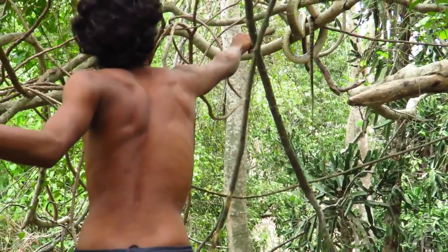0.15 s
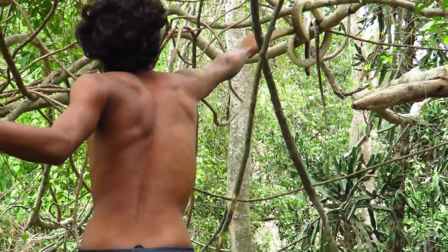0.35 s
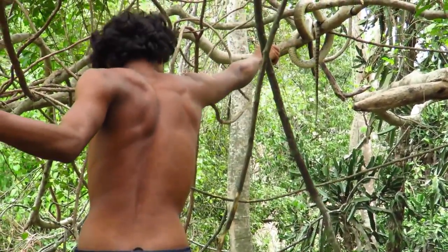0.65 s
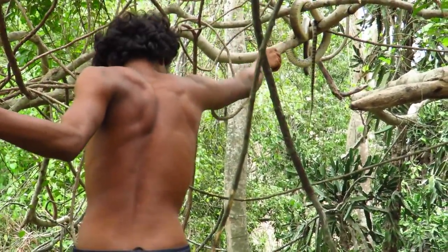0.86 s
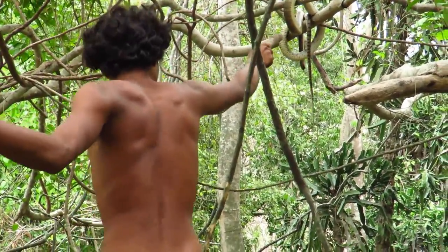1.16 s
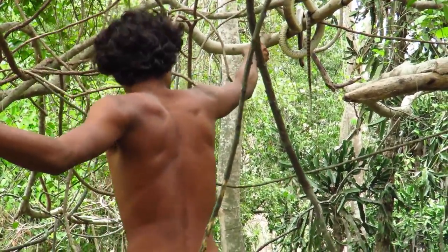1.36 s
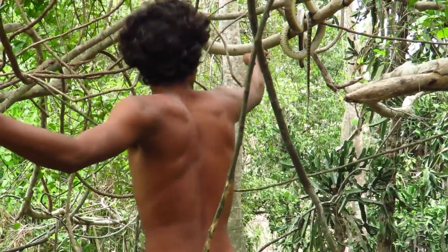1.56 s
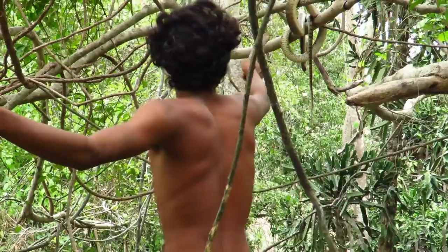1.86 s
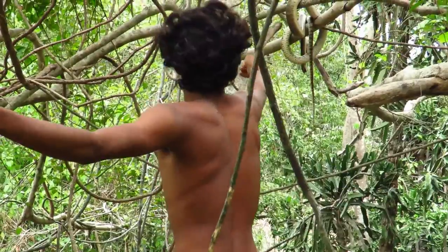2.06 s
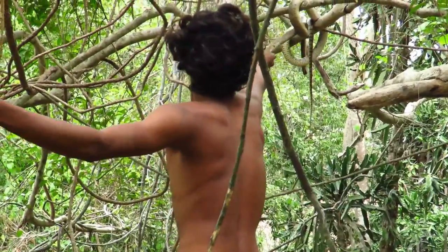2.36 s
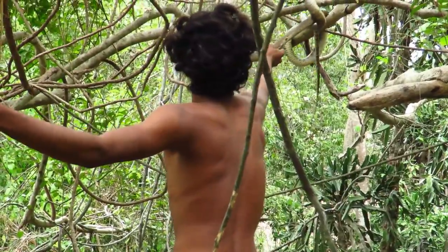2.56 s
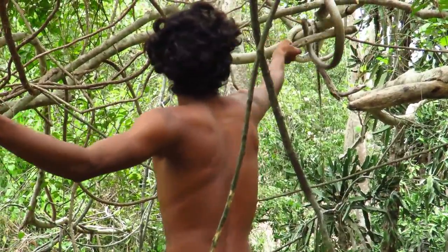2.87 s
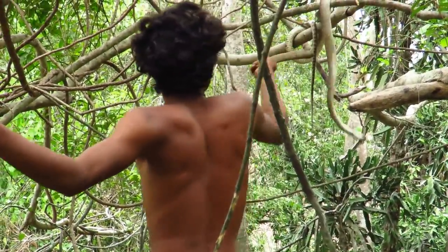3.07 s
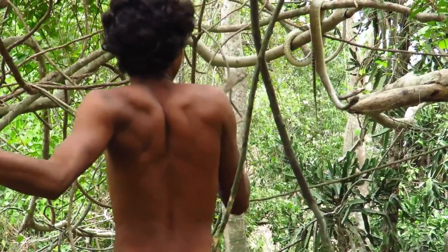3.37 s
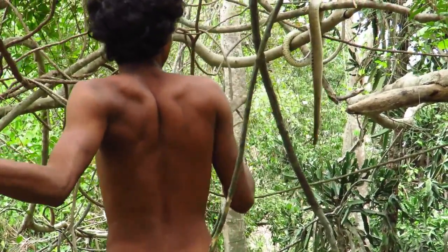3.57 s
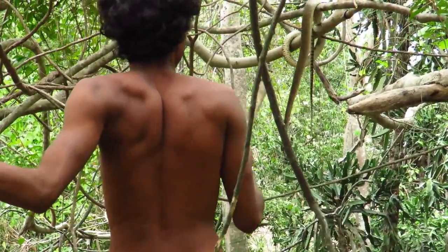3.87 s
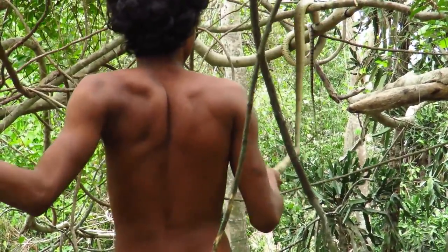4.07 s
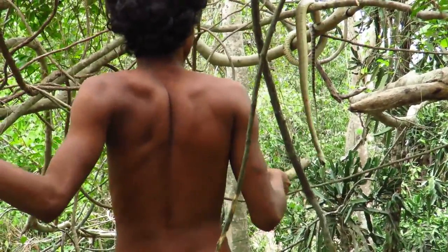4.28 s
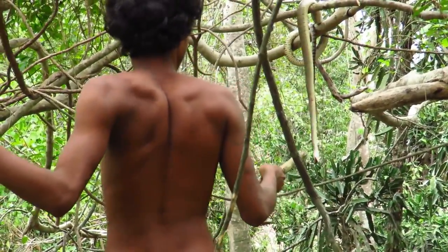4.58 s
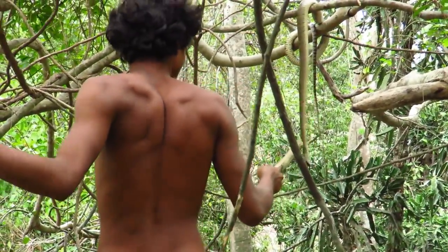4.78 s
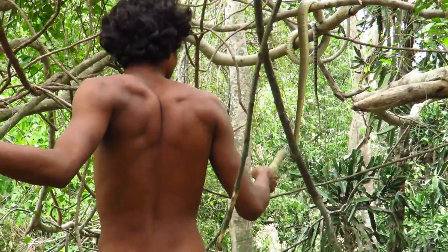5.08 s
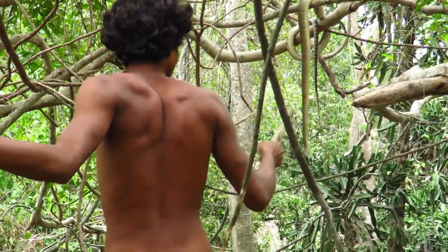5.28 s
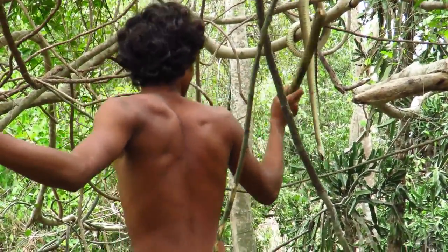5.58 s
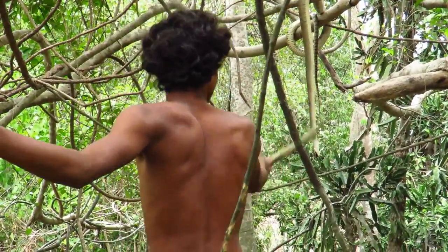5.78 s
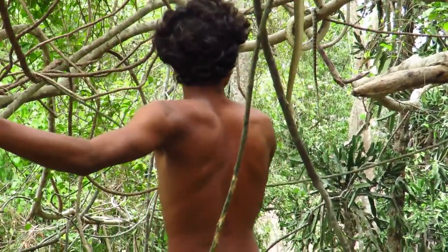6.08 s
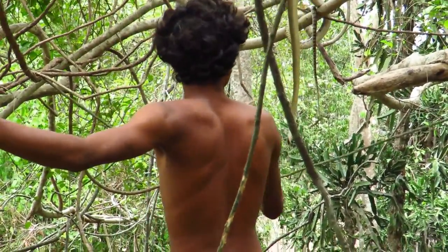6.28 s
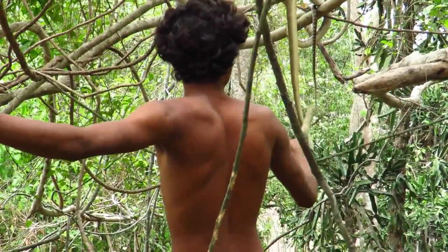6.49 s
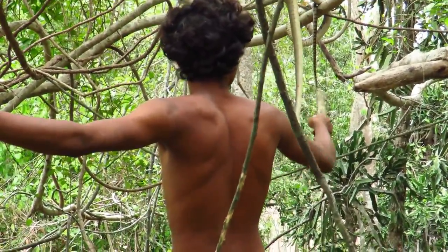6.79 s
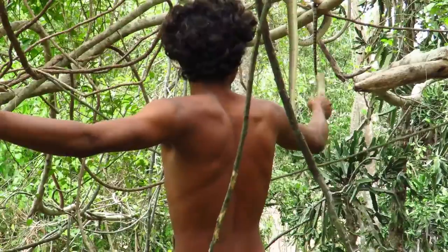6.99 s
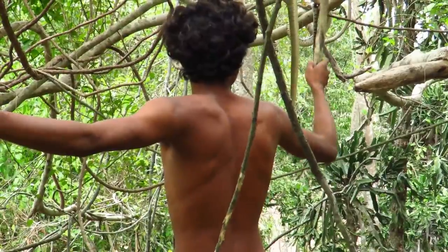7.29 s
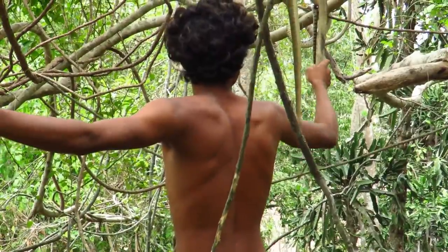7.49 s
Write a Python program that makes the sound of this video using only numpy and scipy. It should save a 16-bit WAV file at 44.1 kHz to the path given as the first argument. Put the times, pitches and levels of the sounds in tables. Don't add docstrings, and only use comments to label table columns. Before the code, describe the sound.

A quiet open-air forest with soft air and a distant humming drone. Sparse dry taps and rustles start near the microphone, birds give short thin whistles behind, then scraping bark and a cluster of woody clicks break in. After a lull of small crackles, a branch snaps hard and dry, rebounds briefly, and leaves settle into faint rustling. Close, dry wood in front; birds slightly echoing; soft low puffs on the microphone.

```python
import sys
import numpy as np
from scipy import signal
from scipy.fft import rfft, irfft
from scipy.io import wavfile
from scipy.ndimage import uniform_filter1d

SR = 44100
rng = np.random.default_rng(int(sys.argv[2]) if len(sys.argv) > 2 else 0)


def convert_level_to_amplitude(level_db):
    exponent = np.asarray(level_db, float) / 20
    return 10 ** exponent


def to_wav(sig):
    pcm = np.clip(np.atleast_2d(sig), -1, 1) * 32767
    pcm = np.round(pcm).astype(np.int16)
    wavfile.write(sys.argv[1], SR, pcm.T)


N = 337006


def evened(x):
    return x / np.sqrt(np.mean(x ** 2) + 1e-20)


def read(points, hz):
    f, value = np.transpose(points)
    return np.interp(np.log(hz + 1), np.log(f + 1), value)


def add(mix, s, sound):
    part = mix[round(s * SR):][:len(sound)]
    part += sound[:len(part)]


def band(x, lo_hz, hi_hz):
    edges = [lo_hz, min(hi_hz, SR / 2 - 1)]
    return signal.sosfilt(signal.butter(2, edges, "band", fs=SR, output="sos"), x)


def resonate(x, hz, width):
    turn = np.exp(2j * np.pi * np.cumsum(hz * np.ones(len(x))) / SR)
    r = np.exp(-np.pi * width / SR)
    return 2 * (turn * signal.lfilter([1 - r], [1, -r], x / turn + 1e-18)).real


def resonate_twice(x, hz, width):
    return resonate(resonate(x, hz, width), hz, width)


def crackle(count, per_s, spread_db):
    draw = rng.random((count, 3))
    size = convert_level_to_amplitude(spread_db * np.minimum(-np.log(draw[:, 1] + 1e-9), 5))
    return evened(size * np.sign(draw[:, 2] - .5) * (draw[:, 0] < per_s / SR))


def hush(shape, patchy_db):
    frames, hz = N // 512 + 6, np.fft.rfftfreq(2048, 1 / SR)
    a, b, patches = rng.standard_normal((frames, 1025, 3)).T
    patches = uniform_filter1d(patches, size=16, axis=0)
    patches = evened(uniform_filter1d(patches, size=8, axis=1))
    z = (a + 1j * b) * convert_level_to_amplitude(read(shape, hz)[:, None] + patchy_db * patches)
    return evened(signal.istft(z, nperseg=2048, noverlap=1536)[1][:N])


def stroke(t, s, level_db, rise, fall):
    return convert_level_to_amplitude(level_db - 15 * np.maximum((s - t) / rise, (t - s) / fall))


# [f/Hz, density/dB per Hz]
LEAF_COLOUR = [(1760, -49), (3000, -18), (3210, -0.5), (4560, 4), (10100, -6), (12400, -7.5), (14500, -9.5),
               (15500, -19)]
# [t/s, level/dB, fall/s]
LEAF_JOLTS = [(0.49, -81, 0.061), (1.31, -103, 0.06), (1.47, -59, 0.17), (1.835, -53, 0.046),
              (2.429, -51.5, 0.021), (3.16, -58.5, 0.1), (3.59, -68, 0.069), (3.758, -66, 0.069),
              (3.87, -48, 0.047), (4.2, -64.5, .08), (4.33, -46, 0.13), (4.5, -61, 0.037),
              (4.62, -60, 0.076), (4.75, -59.5, 0.038), (4.87, -62.5, 0.14), (5.13, -67.5, 0.08),
              (5.85, -48, 0.041), (6.442, -58, 0.046), (6.54, -69, 0.11), (6.99, -63, 0.038)]
# [t/s, level/dB, rise/s, fall/s]
LEAF_SWEEPS = [(0.6, -66, 0.016, 0.26), (0.74, -60.5, 0.23, 0.04), (1.09, -67, 0.34, .25),
               (1.68, -67.5, 0.12, .5), (2.17, -64, 0.012, 0.37), (2.73, -65, 0.31, 0.38),
               (3.36, -61, 0.067, 1), (3.659, -66, 0.065, 0.073), (3.95, -67, 0.043, 0.22),
               (4.97, -69, 0.088, 0.073), (5.45, -61.5, 0.18, 0.041), (5.64, -68, 0.26, 0.045),
               (5.83, -55.5, 0.069, 0.033), (5.92, -57.5, 0.033, 0.11), (6.3, -67, 0.89, 0.25),
               (6.9, -70, 0.13, .04), (7.35, -69, 0.76, 0.56)]


def rustle():
    t, hz = np.arange(N) / SR, np.fft.rfftfreq(N, 1 / SR)
    slow = t[::32]
    jolts = sum(stroke(slow, s, db, 0.39 * fall, fall) for s, db, fall in LEAF_JOLTS)
    sweeps = sum(stroke(slow, *row) for row in LEAF_SWEEPS)
    shower = stroke(slow, BRANCH_BLOWS[1][0], -35, 0.0025, 0.033)
    high = convert_level_to_amplitude(-88) + jolts + sweeps + shower
    low = convert_level_to_amplitude(-73.5) + convert_level_to_amplitude(0.5) * jolts + convert_level_to_amplitude(0.5) * sweeps + convert_level_to_amplitude(-1) * shower
    fizz = evened(irfft(rfft(crackle(N, 5000, 2.85)) * convert_level_to_amplitude(read(LEAF_COLOUR, hz)), N))
    body = evened(band(crackle(N, 3000, 3.6), 1170, 3240))
    return convert_level_to_amplitude(-2.5) * (np.interp(t, slow, high) * fizz + np.interp(t, slow, low) * body)


# [start t/s, length/s, level/dB, bark resonance f/Hz]
BARK_SCRAPES = [
    (2.774, 0.055, -57.5, 1210),
    (3.859, 0.048, -51, 2780),
    (4.311, 0.07, -44, 2230),
    (4.887, 0.044, -60, 2730),
    (5.745, 0.081, -56, 1860),
    (5.828, 0.035, -51, 1480),
    (6.006, 0.047, -54, 1190),
]


def scrape(start, length, top_db, bark_hz):
    t = np.arange(0, 1, 1 / (length * SR))
    arch = np.sin(np.pi * t ** (np.log(.5) / np.log(0.3)))
    level_db = top_db - 2 * (1 - arch)
    hz = bark_hz * (1 - 0.18 * (t - .5))
    patches = [(.55, -8.5), (1.0, -6.5), (1.3, -2), (1.65, -4), (2.1, -9), (2.6, -10.5)]  # (pitch factor, dB)
    bark = np.zeros(len(t))
    for factor, db in patches:
        slips = crackle(len(t), 600, 3)
        bark += convert_level_to_amplitude(db) * evened(resonate_twice(slips, factor * hz, 740))
    fizz = evened(band(crackle(len(t), 5000, 2.1), 4400, 9300))
    sound = convert_level_to_amplitude(level_db) * (evened(bark) + convert_level_to_amplitude(-10) * fizz)
    return start, sound * signal.windows.tukey(len(t), .15)


# [t/s, peak level/dB, main f/Hz, second f/Hz]
BARK_SLIPS = [(2.7844, -42, 764, 2080), (2.7904, -39, 900, 1200), (2.7963, -37, 690, 3640),
              (3.863, -35.5, 2940, 3720), (3.8707, -44, 2900, 2380), (3.8777, -40, 2610, 3170),
              (3.8817, -33, 2720, 4040), (3.8897, -39, 720, 3180), (4.3006, -39, 5150, 2400),
              (4.3077, -39, 2140, 1610), (4.3167, -31.5, 3270, 2270), (4.3232, -35, 1310, 2890),
              (4.3262, -29, 2310, 3770), (4.33, -28.5, 2300, 1740), (4.336, -32, 1330, 2270),
              (4.339, -31, 2000, 3700), (4.3438, -32, 2070, 3200), (4.349, -34, 2230, 1980),
              (4.354, -30, 2080, 1610), (4.3556, -28, 1650, 3370), (4.375, -32, 1770, 2680),
              (4.3859, -37, 1580, 2220), (4.4078, -37, 1730, 2420), (4.6174, -44, 960, 1770),
              (4.8828, -37, 2700, 3200), (4.8889, -35, 2650, 3060), (5.7477, -40, 2390, 1360),
              (5.7624, -47, 2420, 1600), (5.7784, -43, 1520, 2450), (5.7973, -41, 2600, 844),
              (5.8018, -41, 1580, 700), (5.8307, -38, 2130, 2980), (5.8359, -39, 2440, 1180),
              (5.8424, -32, 890, 1210), (5.8458, -41, 2070, 1530), (5.851, -35, 900, 5300),
              (5.856, -39, 1000, 2900), (5.8631, -45, 3750, 3110), (5.9927, -43, 950, 2340),
              (6.0155, -36.5, 876, 1590), (5.961, -37, 2800, 2020), (5.9575, -38, 4700, 2230),
              (5.9665, -25, 850, 1140), (5.8415, -32, 2430, 3480), (5.9705, -36, 4100, 1900)]
# [t/s, peak level/dB, main f/Hz, second f/Hz]
FIBRE_CLICKS = [(1.8205, -46, 3200, 4700), (1.8255, -45, 1550, 4400), (1.8285, -44, 4330, 6900),
                (1.8318, -43, 4400, 2500), (1.837, -45, 2550, 5500), (1.8445, -46, 2500, 6800),
                (4.448, -30, 3300, 2300), (4.4485, -36, 1000, 1700), (4.6143, -33.5, 1800, 4200),
                (4.6583, -38, 1850, 3000), (4.666, -43, 1900, 3300), (4.7392, -39, 2800, 1650),
                (4.7435, -43, 1550, 2900), (4.9535, -44, 3800, 6000), (4.9605, -43, 3600, 1900),
                (4.3175, -34, 5000, 6600), (4.329, -34, 3900, 5200), (4.3372, -34, 6100, 4000),
                (4.3565, -31, 3500, 4300), (4.3688, -31, 3400, 5000), (2.7843, -38, 1150, 800),
                (6.4405, -42, 5100, 8000), (5.9548, -14.5, 4000, 2250), (5.9556, -24, 2150, 4750)]


def slip(s, peak_db, hz, second_hz, cycles):
    t, rise_s, rings = np.arange(1500) / SR, .0003, 0
    for f, db in [(hz, 0), (second_hz, -3.5)]:
        decay_db = 60 * t * np.sqrt(f * 2000) / cycles
        rings = rings + convert_level_to_amplitude(db - decay_db) * np.sin(2 * np.pi * f * t)
    rings = rings * (1 - np.exp(-t / rise_s)) * (1 + 0.1 * rng.standard_normal(1500))
    return s - rise_s, convert_level_to_amplitude(peak_db) * rings / abs(rings).max()


# [t/s, peak level/dB, ring f/Hz, fizz level/dB]
TWIG_SNAPS = [(0.0792, -54, 4100, -29), (2.1714, -47.5, 2730, -1.5), (3.6097, -46.5, 2500, -17),
              (4.1959, -46.5, 2730, -5), (4.2607, -49.5, 4120, -3), (4.8823, -51, 2600, -29),
              (5.4471, -44, 2300, -11), (5.9545, -36, 4300, -15), (6.4405, -41, 4900, -12),
              (6.9825, -53, 3870, -19)]
# [t/s, peak level/dB, ring f/Hz, fizz level/dB]
TWIG_TAPS = [(0.421, -53, 3400, -16), (0.473, -55, 2000, -24), (0.7094, -55, 1810, -33),
             (0.737, -49, 2470, -24), (2.3863, -50.5, 2900, -7), (2.4035, -48, 2400, -6),
             (2.4262, -52, 2360, -3), (3.1295, -51, 2520, -21), (3.7438, -51, 2200, 2),
             (3.938, -47.5, 2620, -7), (4.427, -49.5, 4580, -24), (4.4478, -46, 3100, -23),
             (4.614, -46, 1620, -26), (4.6576, -52, 1860, -28), (4.739, -50.5, 2650, -4),
             (4.785, -50, 2750, -6), (4.9533, -48, 2800, -7), (5.7778, -51, 4520, -15),
             (5.8405, -39.5, 2320, 0.5), (6.137, -51.5, 2310, -38), (6.5417, -50.5, 3550, -26),
             (7.3204, -66, 1960, -20)]


def tick(s, peak_db, hz, fizz_db, knock_db, t60):
    t = np.arange(4000) / SR
    drive = (convert_level_to_amplitude(-60 * t / 0.0082) + convert_level_to_amplitude(-60 * t / t60)) * rng.standard_normal(4000)
    drive[0] = 3.6
    snap = band(drive, 1270, 5250)
    ring = resonate_twice(drive, hz, 0.2 * hz)
    knocking = band(drive, 550, 1900)
    fizz = band(band(drive, 6800, 17000), 6400, 11200)
    snap, ring, knocking, fizz = (p / abs(p).max() for p in (snap, ring, knocking, fizz))
    sound = 1.23 * snap + 1.01 * ring + convert_level_to_amplitude(knock_db + 5.5) * knocking + convert_level_to_amplitude(fizz_db + 4.0) * fizz
    return s, convert_level_to_amplitude(peak_db) * sound


# [t/s, peak level/dB, f/Hz]
TWIG_KNOCKS = [
    (4.3637, -26, 1790),
    (4.3688, -28.5, 1830),
]


def knock(s, peak_db, hz):
    t = np.arange(2500) / SR
    overtone = convert_level_to_amplitude(-9 - 60 * t / 0.022) * np.sin(2 * np.pi * 1.86 * hz * t)
    ring = np.sin(2 * np.pi * hz * t) + overtone
    hold_s, t60 = .0015, .015
    envelope = convert_level_to_amplitude(peak_db - 60 * np.maximum(t - hold_s, 0) / t60) * np.minimum(t / 0.00063, 1)
    return s, envelope * ring


# [t/s, peak level/dB, centre f/Hz]
LEAF_FLICKS = [(0.5716, -55.5, 9530), (1.306, -52.5, 6750), (2.2243, -50, 12200), (2.416, -41.5, 7560),
               (2.722, -48.5, 9560), (2.901, -58, 7260), (3.5264, -52, 9820), (3.594, -42, 8500),
               (3.743, -44, 10100), (4.4934, -47, 8300), (4.8606, -42.5, 9700), (4.988, -51, 6870),
               (6.3814, -51, 6060)]


def flick(s, peak_db, hz, t60):
    t = np.arange(4000) / SR
    drive = (convert_level_to_amplitude(-60 * t / 0.0093) + .5 * convert_level_to_amplitude(-60 * t / t60)) * rng.standard_normal(4000)
    burst = band(drive, 0.72 * hz, 1.39 * hz)
    return s, convert_level_to_amplitude(peak_db + 2.5) * burst / abs(burst).max()


# [t/s, level/dB]
BRANCH_BLOWS = [
    (5.9515, -40),
    (5.95505, -30),
    (5.95512, -6.5),
    (5.957, -32),
    (5.9662, -23),
    (5.9768, -26),
    (6.011, -33),
]
# [f/Hz, level/dB, t60/s]
BRANCH_MODES = [(346, -36, 0.025), (716, -4.5, 0.016), (850, -7, 0.018), (1000, -1, 0.012),
                (1220, -1, 0.037), (1310, -6, 0.034), (1650, 0, 0.0088), (2220, -0.5, 0.01),
                (3220, -21, 0.0061), (1940, -11, 0.0096), (4700, -5, 0.014), (7330, -18, 0.035),
                (9300, -15, .007), (12360, -16, .016)]


def crack():
    t, blows, wood = np.arange(9000) / SR, np.zeros(N), np.zeros(9000)
    for hz, db, t60 in BRANCH_MODES:
        wood += convert_level_to_amplitude(db - 60 * t / t60) * np.sin(2 * np.pi * hz * t)
    for k, (s, db) in enumerate(BRANCH_BLOWS):
        add(blows, s, np.array([-(-1) ** k * convert_level_to_amplitude(db)]))
    splinters = convert_level_to_amplitude(-44 - 60 * t / 0.11) * crackle(9000, 1200, 2.6)
    add(blows, BRANCH_BLOWS[1][0], splinters)
    sound = signal.oaconvolve(blows, wood / abs(wood).max())[:N]
    return band(band(sound, 220, 17000), 140, 20000)


def near_sounds():
    near = rustle() + crack()
    for row in BARK_SCRAPES:
        add(near, *scrape(*row))
    for row in TWIG_SNAPS:
        t60 = 0.087 * .5 ** (max(row[1] + 38, 0) / 14)
        add(near, *tick(*row, knock_db=-8, t60=t60))
    for row in TWIG_TAPS:
        add(near, *tick(*row, knock_db=0.5, t60=0.11))
    for row in BARK_SLIPS:
        add(near, *slip(*row, cycles=30))
    for row in FIBRE_CLICKS:
        add(near, *slip(*row, cycles=17))
    for row in TWIG_KNOCKS:
        add(near, *knock(*row))
    for row in LEAF_FLICKS:
        add(near, *flick(*row, t60=0.14))
    return near


def note(start, end, first_hz, middle_hz, last_hz, first_db, last_db):
    t = np.arange(start, end, 1 / SR)
    blur = np.clip((-40 - last_db) * .025, 0, .6)
    noise = rng.standard_normal((2, len(t)))
    flutter, waver = (evened(uniform_filter1d(uniform_filter1d(n, size=220), size=220)) for n in noise)
    hz = np.interp(t, [start, (start + end) / 2, end], [first_hz, middle_hz, last_hz])
    hz = uniform_filter1d(hz, size=400) * (1 + .01 * blur * waver)
    tone = np.sqrt(2) * np.sin(2 * np.pi * np.cumsum(hz) / SR)
    scattered = evened(resonate_twice(rng.standard_normal(len(t)), hz, 110))
    tone = np.sqrt(1 - blur ** 2) * tone + blur * scattered
    level_db = np.interp(t, [start, end], [first_db, last_db]) + (1.6 + 1.5 * blur) * flutter
    edge_s = .01
    return start, convert_level_to_amplitude(level_db) * tone * signal.windows.tukey(len(t), min(2 * edge_s / (end - start), 1))


# [start t/s, length/s, first f/Hz, level/dB]
PIPER_NOTES = [(1.155, .075, 3900, -60), (1.225, .04, 3880, -66), (1.265, .035, 3930, -66),
               (1.3, .038, 3860, -58), (1.345, .03, 3880, -66), (1.4, .05, 3680, -65),
               (1.455, .045, 3620, -70), (1.515, .03, 3750, -68), (1.545, .055, 3600, -65),
               (1.6, .045, 3580, -68)]
# [start t/s, length/s, f/Hz, level/dB]
HOLDER_NOTES = [(2.066, .05, 1735, -48), (2.112, .056, 1750, -46), (2.195, .03, 1720, -57),
                (2.235, .04, 1770, -60), (2.83, .11, 2675, -62), (2.91, .07, 2950, -65),
                (3.008, .084, 1730, -49), (3.105, .07, 1710, -64), (3.14, .05, 3005, -65),
                (3.2, .04, 2990, -66), (3.615, .04, 2470, -56.5), (3.785, .035, 2660, -65),
                (4.465, .035, 1715, -57), (4.52, .035, 1715, -54), (4.562, .035, 1700, -60),
                (4.67, .03, 1680, -62), (5.155, .065, 2450, -62), (5.42, .035, 2575, -57),
                (5.465, .06, 2560, -63), (5.27, .045, 1850, -66), (5.375, .04, 1720, -65),
                (5.29, .05, 1260, -67)]
# [start t/s, length/s, first f/Hz, last f/Hz, level/dB]
WARBLER_NOTES = [(2.165, .04, 1600, 1050, -52), (2.44, .07, 2300, 2230, -58), (2.35, .03, 2120, 2200, -60),
                 (2.362, .045, 2590, 2520, -58), (2.395, .13, 2500, 2330, -54),
                 (2.518, .083, 2290, 2180, -48), (2.605, .035, 2240, 2200, -59),
                 (2.61, .03, 1710, 1790, -56), (2.635, .035, 1850, 2250, -56),
                 (2.66, .035, 2180, 2250, -61), (2.995, .055, 2420, 2290, -60),
                 (3.13, .11, 1680, 1520, -60), (3.23, .16, 1430, 1250, -62),
                 (5.38, .065, 2950, 2970, -54.5), (5.33, .04, 1400, 1550, -62),
                 (2.64, .05, 2300, 2380, -63), (5.175, .04, 1750, 1200, -56), (5.212, .05, 2050, 2170, -58),
                 (5.25, .06, 1900, 1830, -63), (5.402, .03, 2800, 2540, -55.5),
                 (5.443, .045, 2560, 1900, -56), (5.478, .04, 1950, 1600, -60),
                 (5.54, .055, 2750, 3150, -61)]


def birdsong():
    birds, slide = np.zeros(N), .965
    for s, d, hz, db in PIPER_NOTES:
        add(birds, *note(s, s + d, hz, hz * (1 + 2 * slide) / 3, hz * slide, db - 6, db))
    for s, d, hz, db in HOLDER_NOTES:
        add(birds, *note(s, s + d, hz, hz, hz, db - 2, db + 4.0))
    for s, d, a, b, db in WARBLER_NOTES:
        add(birds, *note(s, s + d, a, (a + b) / 2, b, db, db - 4))
    return birds


def trunks(x, t60):
    t = np.arange(SR // 2) / SR
    taps = rng.standard_normal((2, len(t))) * (rng.random((2, len(t))) < .05)
    taps = taps * convert_level_to_amplitude(-60 * t / t60) * (t > .003)
    return signal.fftconvolve(x[None], taps / np.linalg.norm(taps, axis=1, keepdims=True), axes=1)[:, :N]


# [t/s, peak level/dB, f/Hz]
WOOD_BUMPS = [(0.964, -44, 745), (1.939, -41, 360), (2.046, -38, 786), (2.238, -34.5, 790),
              (3.833, -38, 610), (3.933, -48, 550), (2.799, -40, 305), (3.389, -39, 1190),
              (4.321, -38, 800), (4.337, -38, 750), (4.369, -34, 970), (4.6088, -40, 600),
              (4.779, -41.5, 555), (5.8454, -41, 330), (5.982, -28, 1200)]
# [t/s, peak level/dB, f/Hz]
WIND_PUFFS = [
    (0.948, -51, 54),
    (2.039, -47, 86.1),
    (2.8, -42.5, 193),
    (3.449, -47, 72.7),
    (5.488, -42, 90),
]


def bump(s, peak_db, hz):
    t = np.arange(3000) / SR
    envelope = np.exp(1 - t * hz / 1.17) * t * hz / 1.03
    return s, convert_level_to_amplitude(peak_db - 5.0) * np.sin(2 * np.pi * hz * t) * envelope


# [f/Hz, density/dB per Hz]
AIR_COLOUR = [(15, -42), (25, -25), (82, 0.5), (204, -2.5), (274, -2.5), (340, -1.5), (495, -6.5),
              (552, -7), (782, -1), (945, -9), (1300, -11.5), (1490, -10.5), (10600, -34), (12800, -37.5),
              (15500, -65)]
# [t/s, level/dB]
DRONE_SWELL = [(0.0, -54), (0.72, -51.5), (1.5, -50.5), (2.7, -49.5), (2.94, -49.5), (3.211, -49.5),
               (3.89, -52), (4.57, -52.5), (5.09, -59), (5.89, -57), (6.94, -67), (7.64, -57)]
# [f/Hz, width/Hz, rms level/dB]
DRONE_HUMS = [
    (79.6, 21.5, -61),
    (338.6, 15, -60),
    (437.3, 13.5, -65.5),
    (564.7, 14.4, -64.5),
    (674, 36, -71),
]


def air():
    t, noise = np.arange(N) / SR, rng.standard_normal((N, len(DRONE_HUMS) + 2)).T
    s, swell_db = np.transpose(DRONE_SWELL)
    drone_db = np.interp(t, s, swell_db)
    drone = convert_level_to_amplitude(drone_db - 5.5) * evened(band(noise[0], 402, 913))
    beat = np.cos(2 * np.pi * (t - 0.67) / 0.812)
    whir_db = -66 + 0.36 * (drone_db - max(swell_db)) + 2.5 * beat
    whir = convert_level_to_amplitude(whir_db) * evened(resonate_twice(noise[1], 1290, 120))
    hums = sum(convert_level_to_amplitude(db) * evened(resonate(n, hz, w)) for n, (hz, w, db) in zip(noise[2:], DRONE_HUMS))
    hums = hums * convert_level_to_amplitude(0.16 * (drone_db + 52.5))
    return convert_level_to_amplitude(-54.5) * hush(AIR_COLOUR, patchy_db=2.5) + drone + whir + hums


# [f/Hz, density/dB per Hz]
PORT_DIFFERENCE = [(15, -61), (25, -33), (133, -7), (221, 0.5), (445, 0.5), (614, -6), (3170, -22),
                   (12200, -40), (13900, -42), (15500, -66)]


def side_air():
    return convert_level_to_amplitude(-51) * hush(PORT_DIFFERENCE, patchy_db=0.3)


def scene():
    near, birds, bumps = near_sounds(), birdsong(), np.zeros(N)
    for table in (WOOD_BUMPS, WIND_PUFFS):
        for row in table:
            add(bumps, *bump(*row))
    echo = convert_level_to_amplitude([[-14], [-19]]) * trunks(near, 0.041)
    echo += convert_level_to_amplitude([[-8], [-10.5]]) * trunks(birds, .65)
    mid = near + birds + bumps + air() + echo[0]
    side = side_air() + echo[1] + 0.092 * bumps + 0.067 * np.gradient(near)
    side += convert_level_to_amplitude(-1.) * band(trunks(near, .02)[1], 8000, 17000)
    return np.array([mid + side, mid - side])


def roll_off(x):
    return signal.sosfilt(signal.butter(12, 15700, fs=SR, output="sos"), x)


def record(dry):
    dull = signal.sosfilt(signal.butter(8, 14600, fs=SR, output="sos"), dry)
    return roll_off(dull)


dry = scene()
out = record(dry)
to_wav(out)
```